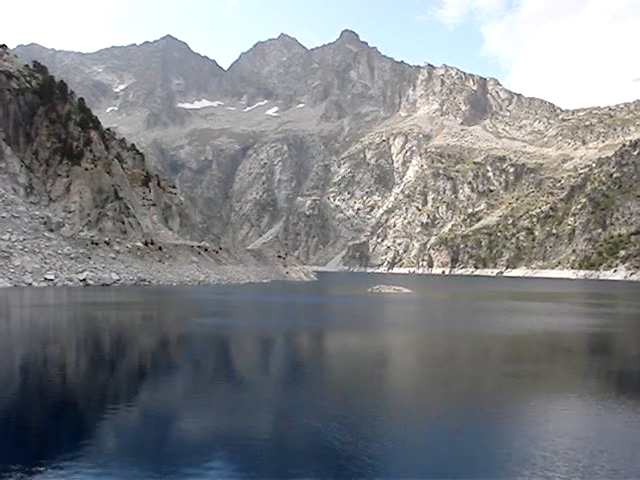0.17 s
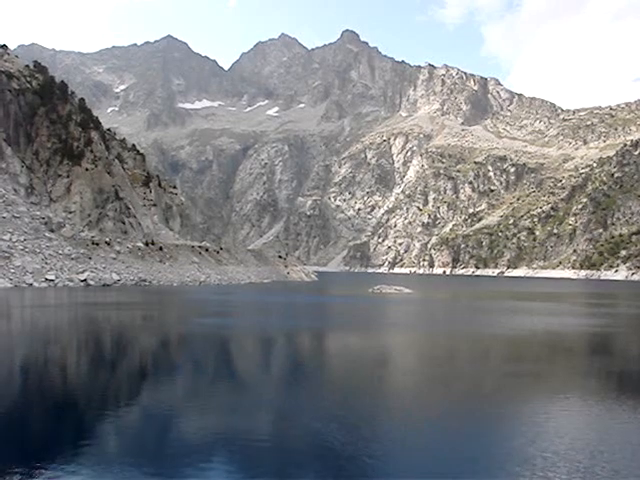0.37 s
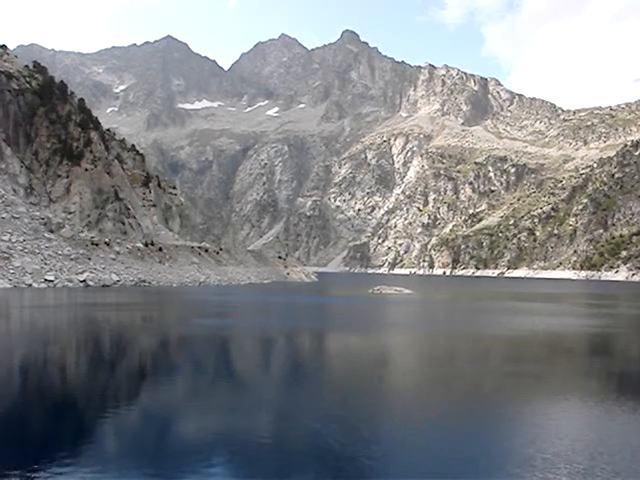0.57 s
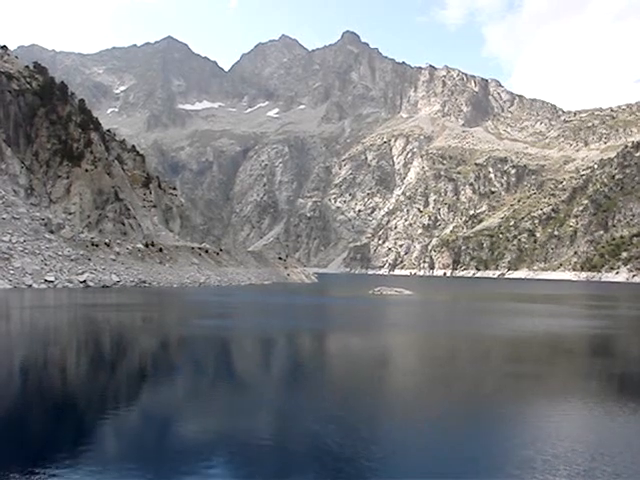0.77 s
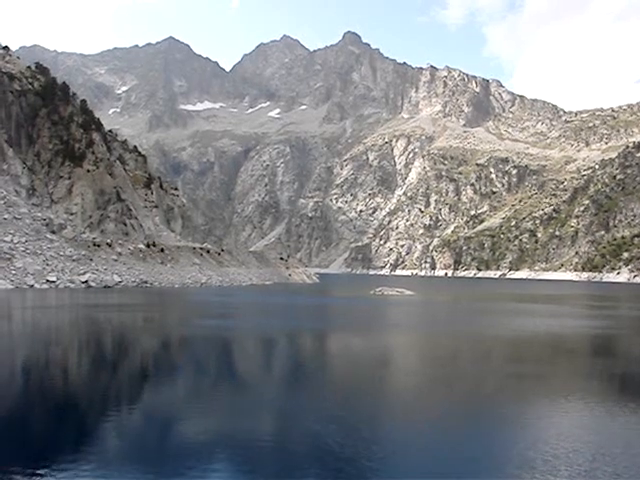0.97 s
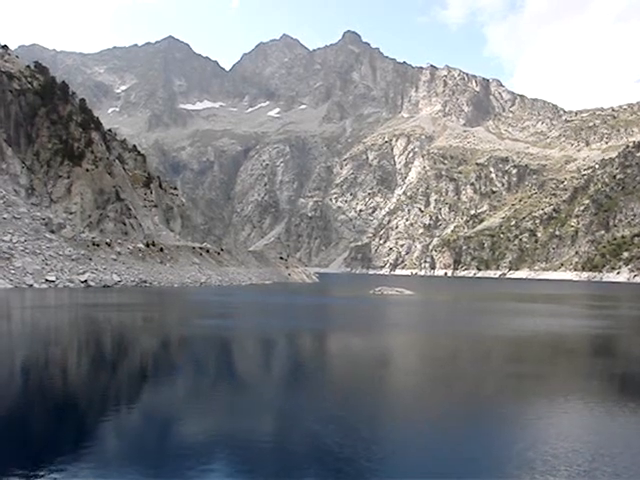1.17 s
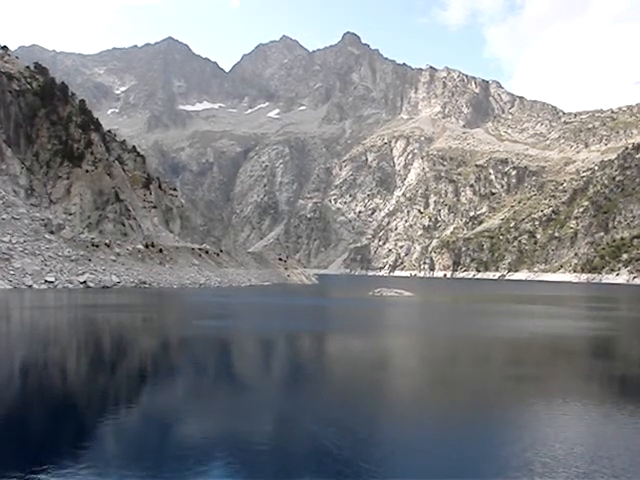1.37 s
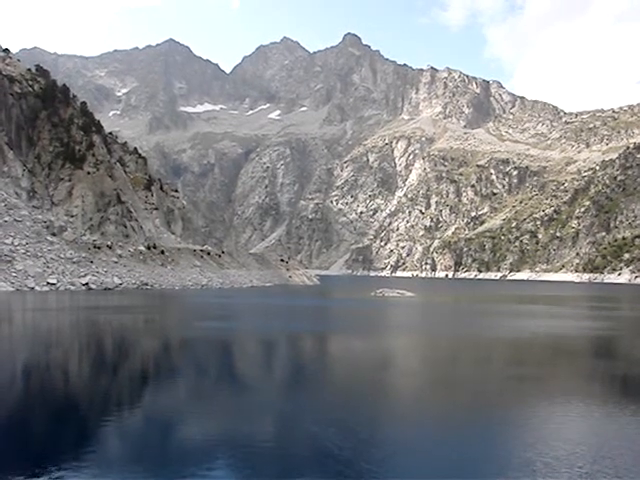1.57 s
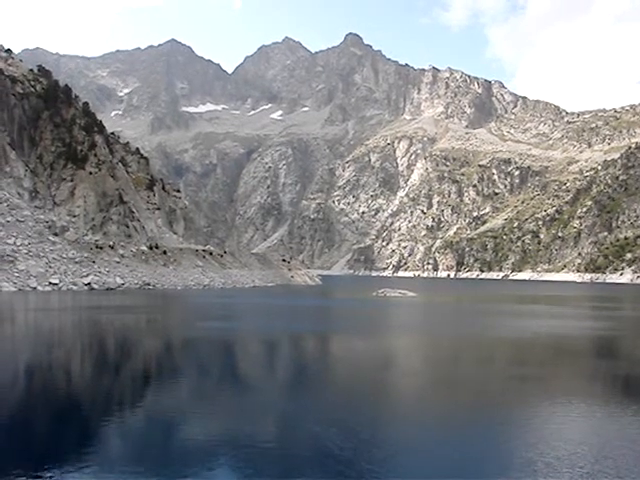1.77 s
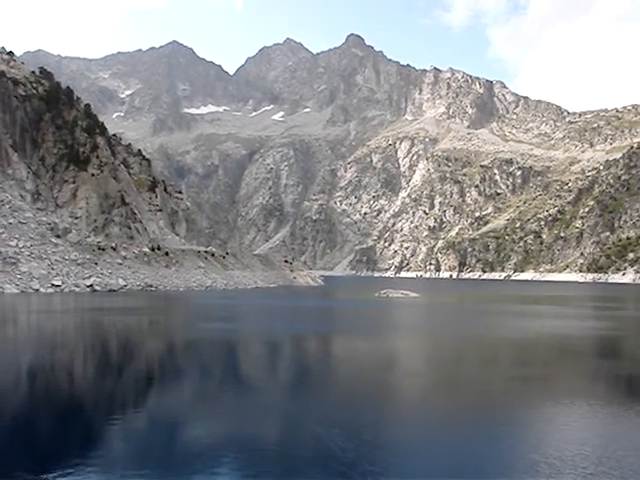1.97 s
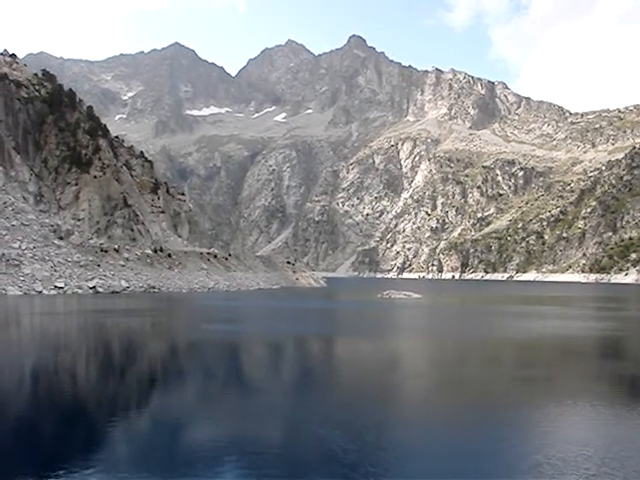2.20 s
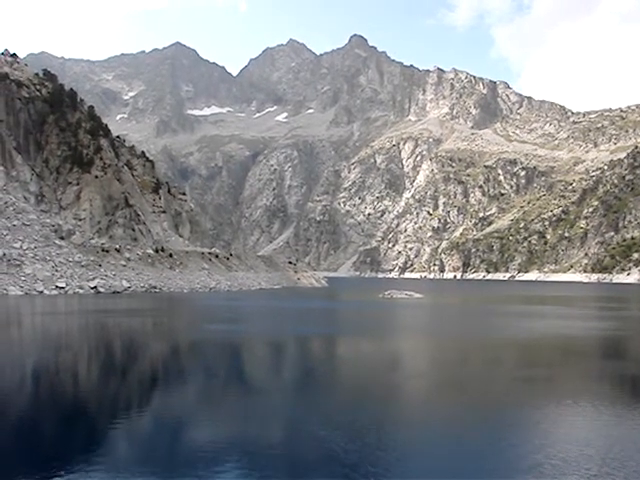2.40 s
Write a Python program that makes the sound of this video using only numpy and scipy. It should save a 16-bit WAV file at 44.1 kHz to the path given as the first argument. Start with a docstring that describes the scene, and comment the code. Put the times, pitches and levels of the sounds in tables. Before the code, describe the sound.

Four piercing marmot whistles ring off rock walls over far cattle bells, steady hiss and light wind

```python
"""Whistles across a mountain lake

An animal, probably a marmot, whistles four times; each nearly pure, arching tone is held by the rock walls
as a long wash of decaying noise. Far bells, probably on grazing cattle, are decaying sines blurred by the
same valley echo, with clearer strokes swelling out. Shaped noise makes a steady hiss of air and water over a
faint hum. Light wind rumbles and bumps the microphone, with a lull in the middle."""
import sys
import numpy as np
from scipy import signal
from scipy.fft import rfft, irfft
from scipy.io import wavfile

SR = 44100
rng = np.random.default_rng(int(sys.argv[2]) if len(sys.argv) > 2 else 0)


def output_pcm(signal):
    """Save a mono or channel-first signal as 16-bit PCM at the path in sys.argv[1].

    Samples are clipped to [-1, 1] before scaling.
    """
    pcm = np.clip(np.atleast_2d(signal).T, -1, 1) * 32767
    wavfile.write(sys.argv[1], SR, np.round(pcm).astype(np.int16))


N = 112014
TIME = np.arange(N) / SR  # seconds


def amp(db):
    """Decibels to gain."""
    return 10 ** (np.asarray(db) / 20)


def unit(x):
    """Scales to rms 1."""
    return x / np.sqrt(np.mean(abs(x) ** 2) + 1e-20)


def curve(points):
    """Joins (seconds, value) points by straight lines."""
    return np.interp(TIME, *np.transpose(points))


def decay(t, t60):
    """Exponential decay that falls 60 dB in t60 seconds."""
    return np.exp(-np.log(1000) * t / t60)


def add(mix, start, sound):
    """Mixes a sound in at a time in seconds, cut off where the mix ends."""
    part = mix[max(round(start * SR), 0):][:len(sound)]
    part += sound[:len(part)]


def noise(points):
    """Noise of rms 1 with a spectrum of (Hz, dB) points, joined over log frequency."""
    f, db = np.transpose(points)
    hz = np.fft.rfftfreq(N, 1 / SR)
    gain = amp(np.interp(np.log(hz + 1), np.log(f), db))
    return unit(irfft(rfft(rng.standard_normal(N)) * gain, N))


def wander(rate_hz):
    """Slow random motion of rms 1: noise under a Gaussian low-pass."""
    hz = np.fft.rfftfreq(N, 1 / SR)
    return unit(irfft(rfft(rng.standard_normal(N)) * np.exp(-(hz / rate_hz) ** 2), N))


def tail(t60, build_s):
    """A diffuse echo of energy 1: noise that builds up and dies away."""
    h = rng.standard_normal(N) * (1 - np.exp(-TIME / build_s)) * decay(TIME, t60)
    return h / np.linalg.norm(h)


# The long echo between the rock walls, shared by calls and bells
VALLEY_T60, VALLEY_BUILD_S = 5.1, 0.064  # seconds


def valley_tail():
    """The valley's slow wash, many reflections merged into decaying noise."""
    return tail(VALLEY_T60, VALLEY_BUILD_S)


# Spectrum of the steady air and water. Each row: frequency in Hz, relative level in dB per Hz.
AIR = [(20, -15), (100, -2.5), (200, -3.5), (300, 3), (600, 0), (1000, 0), (1280, -4), (1550, -5),
       (1950, -7.5), (3300, -11), (5500, -12.5), (8000, -14.5), (10000, -19)]
# Swell of the hiss's middle band. Each row: time in seconds, level change in dB.
SWELL = [(0, 0), (.33, -0.5), (.65, 0.5), (1.05, 0.5), (1.25, 0.5), (1.5, -0.5), (1.75, 2.5), (1.9, 0),
         (2.15, -1.5), (2.35, 1), (2.54, -3)]
AIR_DB, AIR_PATCHY_DB = -54, 2.14  # hiss before the swell; rms flicker of its middle band
HUM_HZ, HUM_DB = 54.5, -69


def air():
    """Even hiss whose middle band swells and flickers, over a faint low hum."""
    hiss = noise(AIR)
    band = signal.butter(2, [450, 1800], "bandpass", fs=SR, output="sos")
    middle = signal.sosfiltfilt(band, hiss)
    body = middle * amp(curve(SWELL) + AIR_PATCHY_DB * wander(rate_hz=49))
    hum = np.sqrt(2) * amp(HUM_DB) * np.sin(2 * np.pi * HUM_HZ * TIME)
    return amp(AIR_DB) * (hiss - middle + body) + hum


# Spectrum of the wind rumble. Each row: frequency in Hz, relative level in dB per Hz.
RUMBLE = [(10, -10), (30, -7), (60, 2.5), (120, -7.5), (200, -13.5), (400, -34), (1500, -76.5)]
# Wind rumble at the microphone. Each row: time in seconds, level in dB.
GUSTS = [(0, -56), (.18, -58), (.32, -56), (.37, -68), (.46, -60.5), (.55, -60.5), (.7, -59.5), (.8, -56),
         (.86, -75), (.95, -61.5), (1.23, -59), (1.3, -80), (2.0, -68), (2.14, -56), (2.22, -59),
         (2.31, -55.5), (2.38, -63), (2.54, -58.5)]
# Wind bumps on the microphone. Each row: centre in seconds, peak level in dB, half width in seconds.
BUMPS = [(0.1359, -44.5, 0.0025), (0.2856, -45, 0.001), (0.535, -46, 0.0026), (0.595, -45, 0.0039),
         (0.7282, -41, 0.0019), (0.912, -45.5, 0.0028), (0.9597, -38, 0.002), (0.9828, -46.5, 0.003),
         (1.0966, -40, 0.002), (1.1518, -39.5, 0.0023), (1.2282, -43, 0.0029), (2.145, -49, 0.0057),
         (2.303, -43.5, 0.0066)]
SUCTION, SUCTION_LAG, SUCTION_WIDTH = 0.46, 0.41, 3.1  # wider dip: share of the bump, then in half widths


def wind():
    """Low rumble in gusts, and single eddies that push and pull on the microphone."""
    out = noise(RUMBLE) * amp(curve(GUSTS))
    for centre, db, width in BUMPS:
        u = (TIME - centre) / width
        push = np.exp(-u ** 2)
        pull = SUCTION * np.exp(-((u - SUCTION_LAG) / SUCTION_WIDTH) ** 2)
        bump = push - pull
        out += amp(db) * bump / abs(bump).max()
    return out


# Tones of the far herd's bells. Each row: centre pitch in Hz, level in dB before HERD_LEVEL.
BELLS = [(258, -70.5), (335, -67.5), (398, -65.5), (440, -69), (497, -72.5), (745, -64.5), (775, -63.5),
         (890, -72), (1032, -64.5), (1095, -74.5), (1405, -66.5), (1470, -64), (1530, -67)]
# Rise and fall of all these bells together. Each row: time in seconds, level change in dB.
HERD_LEVEL = [(0, 0), (.2, -1), (.33, -6.5), (.5, -0.5), (1.05, -2.5), (1.23, -6), (1.4, -1.5),
              (1.75, -0.5), (1.88, -5), (2.15, 0.5), (2.35, -12.5), (2.54, -1)]
STROKES_PER_S, BELL_T60 = 14, 0.29  # strokes on each tone; ring in seconds
BELL_SPREAD = .014  # largest detuning either way, as a share of the pitch


def herd():
    """Many random strokes on slightly unlike bells, decaying sines smeared by the valley."""
    t = TIME[:SR // 2]
    out = np.zeros(N)
    for centre_hz, db in BELLS:
        ring = np.zeros(N)
        for when, detune, force in rng.random((round(STROKES_PER_S * N / SR), 3)):
            hz = centre_hz * (1 + BELL_SPREAD * (2 * detune - 1))
            stroke = force * np.sin(2 * np.pi * hz * t) * decay(t, BELL_T60)
            add(ring, when * N / SR, stroke)
        # the unpadded transform wraps the echo round, so the wash is there from the start
        smeared = irfft(rfft(ring) * rfft(valley_tail()), N)
        out += amp(db) * unit(smeared)
    return out * amp(curve(HERD_LEVEL))


# Clearer far bell strokes. Each row: start in seconds, pitch in Hz, level in dB before rise and decay.
CLANGS = [(.195, 786, -52.5), (.39, 770, -50.5), (.56, 752, -57), (0.729, 1430, -51), (.83, 392, -56.5),
          (0.851, 1535, -58), (0.959, 399, -52.5), (1.15, 767, -58), (1.322, 1412, -54), (1.38, 392, -53),
          (1.61, 778, -56), (1.629, 1046, -57), (1.70, 1540, -58.5), (1.73, 773, -55), (1.93, 767, -54.5),
          (2.061, 1447, -53), (2.08, 402.4, -55.5), (2.19, 1487, -60)]
CLANG_RISE_S, CLANG_T60 = 0.0085, 0.52  # seconds
CLANG_BLUR, CLANG_WIDTH_HZ = 0.92, 39  # random part against the steady tone's 1; its rate


def clangs():
    """Single bell tones swell out of the herd, their attack blurred by distance."""
    out = np.zeros(N)
    shape = (1 - np.exp(-(TIME / CLANG_RISE_S) ** 2)) * decay(TIME, CLANG_T60)
    for start, hz, db in CLANGS:
        drift = wander(CLANG_WIDTH_HZ) + 1j * wander(CLANG_WIDTH_HZ)
        blur = unit(1 + CLANG_BLUR * drift)  # moves both level and phase
        tone = (blur * np.exp(2j * np.pi * hz * TIME)).real
        add(out, start, np.sqrt(2) * amp(db) * shape * tone)
    return out


# Pitch arch: ends as shares of the top pitch, exponents of the bends, rms jitter as a share of the pitch
START_SHARE, END_SHARE, RISE_BEND, FALL_BEND, JITTER = .655, .715, 1.9, 1.18, 0.013
# Effort surges to its peak, sags to a plateau and fades at the end
SURGE_DB_PER_S, SAG_DB, SAG_S, FADE_DB, FADE_BEND = 258.5, -7, 0.009, -13.5, 3.1
FLUTTER_DB, OCTAVE_DB = 2, -29.5  # rms flutter; octave against the fundamental
ATTACK_S, RELEASE_S = 0.0046, 0.021


def whistle(rise, fall, top_hz, db, loudest):
    """A nearly pure tone that shoots up with a hard push, then sinks and fades."""
    t = np.arange(0, rise + fall, 1 / SR)
    up = np.clip(1 - t / rise, 0, 1)
    down = np.clip((t - rise) / fall, 0, 1)
    hz = top_hz * (1 - (1 - START_SHARE) * up ** RISE_BEND - (1 - END_SHARE) * down ** FALL_BEND)
    jittered_hz = hz * (1 + JITTER * wander(rate_hz=157)[:len(t)])
    phase = 2 * np.pi * np.cumsum(jittered_hz) / SR

    before = np.maximum(loudest - t, 0)
    after = np.maximum(t - loudest, 0)
    surge_db = -SURGE_DB_PER_S * before
    sag_db = SAG_DB * (1 - np.exp(-(after / SAG_S) ** 2))
    fade_db = FADE_DB * down ** FADE_BEND
    flutter_db = FLUTTER_DB * wander(rate_hz=62)[:len(t)]
    level = amp(db + surge_db + sag_db + fade_db + flutter_db)
    gate = np.minimum(t / ATTACK_S, 1) * np.minimum((rise + fall - t) / RELEASE_S, 1)
    tone = np.sin(phase) + amp(OCTAVE_DB) * np.sin(2 * phase)
    return np.sqrt(2) * level * gate * tone


# Calls across the lake. Each row: start in seconds, pitch rise in seconds, pitch fall in seconds,
# top pitch in Hz, level in dB before effort and flutter, loudest point in seconds after the start.
WHISTLES = [(.053, .048, 0.085, 3082, -48, 0.036), (.614, .047, .088, 2995, -48.5, .014),
            (1.303, .045, .082, 2960, -48.5, 0.02), (2.084, 0.047, .087, 2940, -48.5, 0.027)]
# A call before the start, of which only the echo is left: the same columns without the start.
EARLIER = (0.34, 0.02, 3140, -49, -0.1)
EARLIER_S, LEAD_S = -.45, 1  # start of that call; time computed ahead of the scene, in seconds
# Reflections from nearby rocks. Each row: delay in seconds, level in dB against the direct call.
ROCKS = [(.0052, -10.5), (0.0108, -16), (0.022, -11.5)]
SCATTER_DB, SCATTER_T60, VALLEY_DB = -9.5, .1, -3  # echo energies against the direct call; T60 in seconds


def marmot():
    """The calls, their quick reflections and the long echo of the valley."""
    lead = LEAD_S * SR
    calls = np.zeros(N + lead)
    for start, *shape in [(EARLIER_S, *EARLIER), *WHISTLES]:
        add(calls, start + LEAD_S, whistle(*shape))
    scatter = amp(SCATTER_DB) * tail(SCATTER_T60, build_s=0.0027)
    space = amp(VALLEY_DB) * valley_tail() + scatter
    space[0] += 1  # the direct call
    for delay, db in ROCKS:
        space[round(delay * SR)] += amp(db)
    return signal.fftconvolve(calls, space)[lead:lead + N]


def scene():
    """The valley in one channel."""
    return (air() + wind() + herd() + clangs() + marmot())[None]


OPEN_S, EDGE_HZ = 0.0463, 10080  # fully open at this time; low-pass edge


def record(dry):
    """The sound opens after a moment of silence and is band-limited."""
    opened = dry * np.clip((TIME - OPEN_S) / 0.0058 + 1, 0, 1)  # ramp of 5.8 ms
    low_pass = signal.firwin(601, EDGE_HZ, window=("kaiser", 8), fs=SR)
    return signal.oaconvolve(opened, low_pass[None], "same")


dry = scene()
out = record(dry)
output_pcm(out)
```